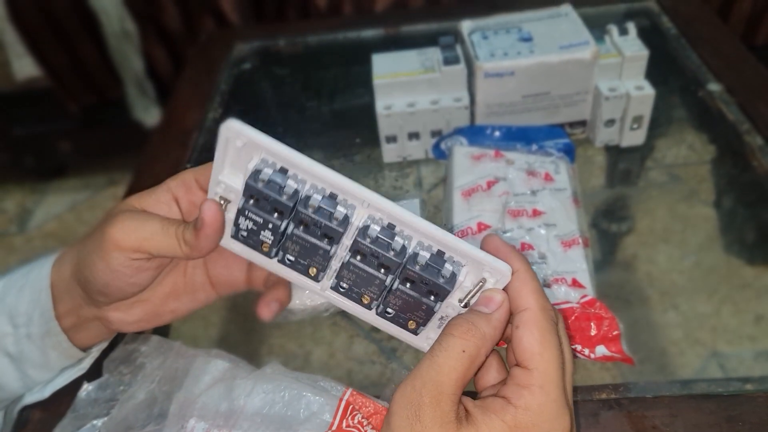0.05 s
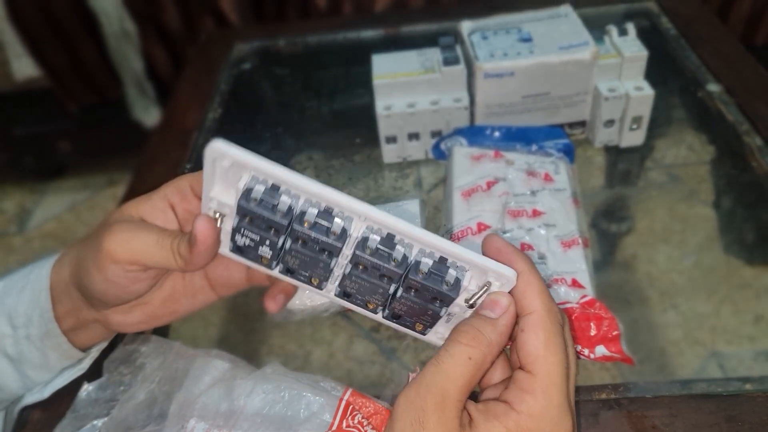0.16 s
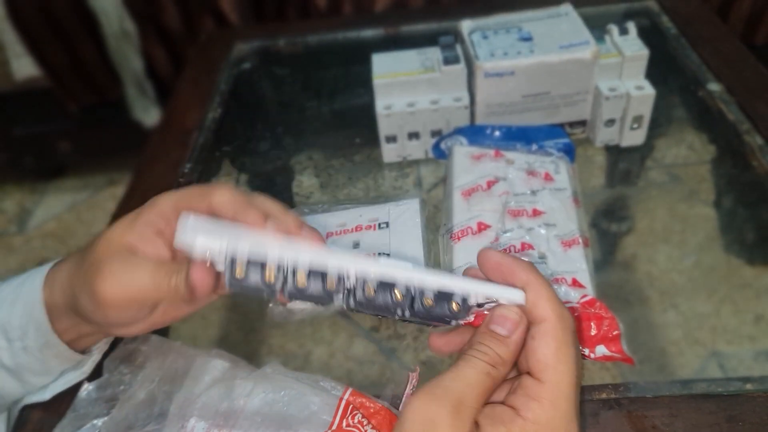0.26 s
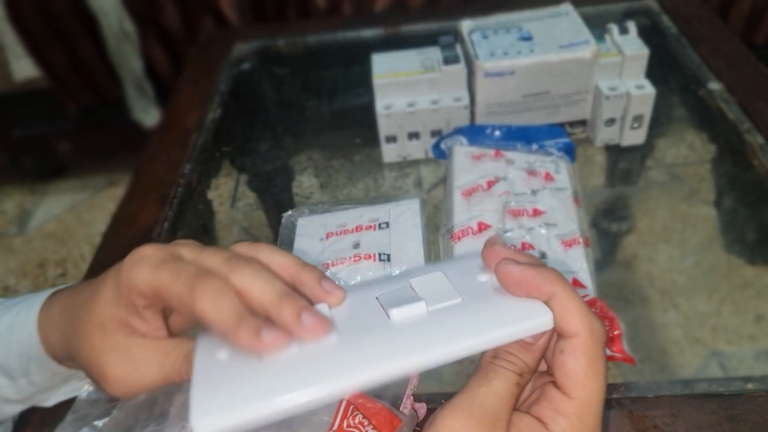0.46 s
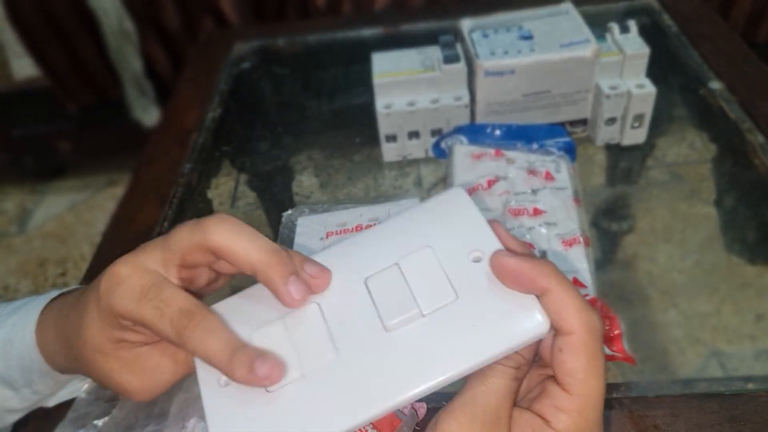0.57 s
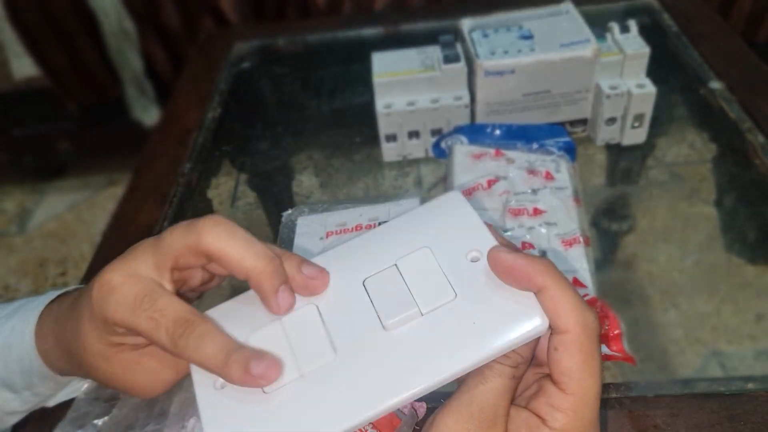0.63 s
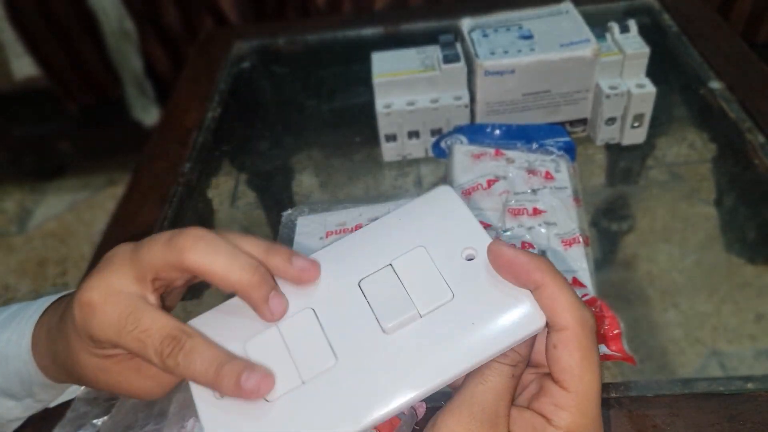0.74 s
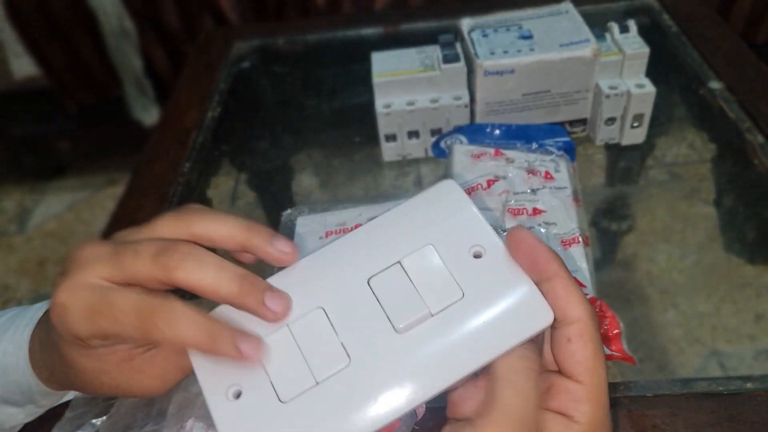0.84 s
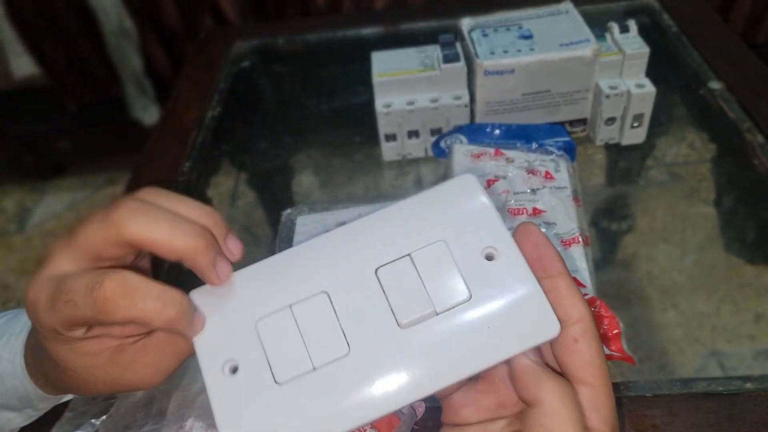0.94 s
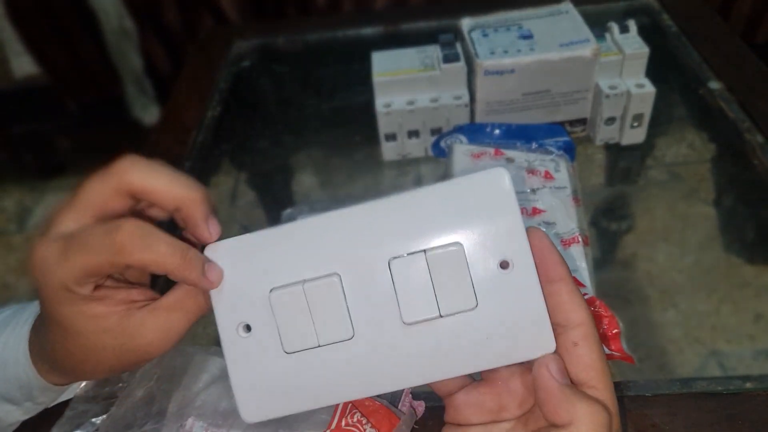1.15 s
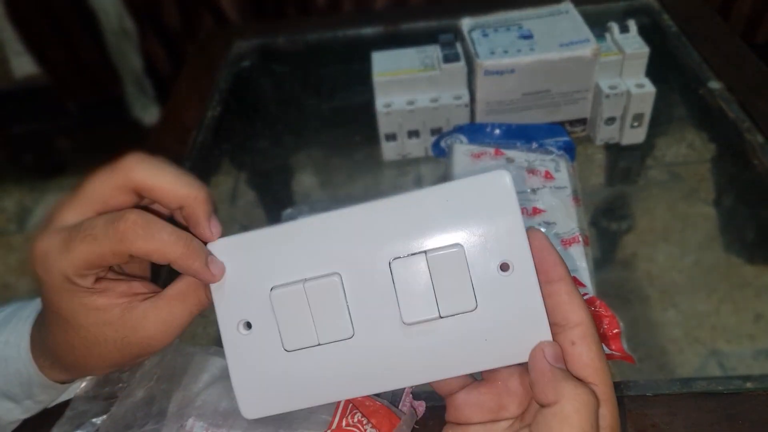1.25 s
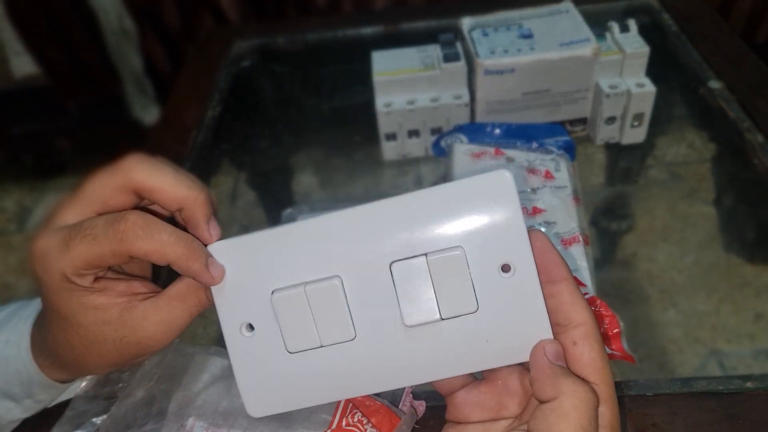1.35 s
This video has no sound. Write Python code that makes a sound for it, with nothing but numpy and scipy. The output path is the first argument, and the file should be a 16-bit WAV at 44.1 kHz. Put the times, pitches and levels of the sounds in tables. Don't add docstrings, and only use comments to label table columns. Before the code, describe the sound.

One loud crisp switch click rings briefly in a hard room, then faint finger ticks on plastic.

```python
import sys
import numpy as np
from scipy import signal
from scipy.fft import rfft, irfft
from scipy.io import wavfile
from scipy.ndimage import uniform_filter1d

SR = 44100
rng = np.random.default_rng(int(sys.argv[2]) if len(sys.argv) > 2 else 0)


def generate_wav(signal):
    frames = np.transpose(np.atleast_2d(signal))
    scaled = np.clip(frames, -1, 1) * 32767
    pcm = np.round(scaled).astype(np.int16)
    wavfile.write(sys.argv[1], SR, pcm)


def volts_from_decibels(level):
    exponent = np.asarray(level, float) / 20
    return 10 ** exponent


N = 61740
FAINT_TOP_HZ = 15900


def evened(x):
    return x / np.sqrt(np.mean(x ** 2) + 1e-20)


def read(points, hz):
    point_hz, value = np.transpose(points)
    return np.interp(np.log(hz + 1), np.log(point_hz + 1), value)


def add(mix, start_s, sound):
    at = round(start_s * SR)
    sound = sound[..., max(-at, 0):]
    part = mix[..., max(at, 0):][..., :sound.shape[-1]]
    part += sound[..., :part.shape[-1]]


def sides(pan_db):
    return volts_from_decibels(np.array([[.5], [-.5]]) * pan_db)


def slow(width_hz, size):
    r = np.exp(-np.pi * width_hz / SR)
    return evened(signal.lfilter([1], [1, -2 * r, r * r], rng.standard_normal(size)))


def stroke_shape(t, length_s):
    return (2 * t / length_s) * np.exp(1 - 2 * t / length_s)


# hz, t60_s
ROOM_DECAY = [(500, .2), (1300, 0.28), (2600, .5), (5000, 0.47), (8000, 0.49), (12000, 0.36), (16000, .28)]
# hz, level_db
SNAP_TO_ROOM = [(600, -35), (1200, -10), (2000, -18.5), (3500, -10.5), (5900, -7), (7200, -10.5),
                (8600, -8), (16000, -19)]
ROOM_RISE_S, ROOM_PAN_DB = 0.004, -8.5


def room(colour):
    taps = np.zeros((2, SR))
    slots = np.arange(60, SR - 12, 12)
    at = slots + rng.integers(0, 12, (2, len(slots)))
    np.put_along_axis(taps, at, rng.choice([-1., 1.], at.shape), 1)
    hz, t, z = signal.stft(taps, SR, nperseg=256)
    level_db = read(colour, hz)[:, None] - 60 * t / read(ROOM_DECAY, hz)[:, None]
    z = z * (hz < FAINT_TOP_HZ)[:, None] * volts_from_decibels(level_db)
    tail = signal.istft(z, SR, nperseg=256)[1][:, :SR]
    rise = 1 - np.exp(-(np.arange(SR) / SR / ROOM_RISE_S) ** 2)
    return tail * rise * sides(ROOM_PAN_DB)


# hz, level_db_per_hz
AIR_COLOUR = [(28, -30), (52, -5.5), (608, -11), (950, -21.5), (3000, -25), (4100, -25), (4800, -35),
              (16000, -62)]
# hz, likeness
AIR_LIKENESS = [(60, 1), (180, 0.98), (550, 0.15), (1650, -0.0063), (4970, -0.65), (15000, 0.03)]
# hz, left_minus_right_db
AIR_BALANCE = [(60, -3), (180, 0.5), (550, -1.5), (1650, 6), (4970, -8), (15000, -20)]
AIR_DB = -53


def air():
    frames, hz = N // 256 + 5, np.fft.rfftfreq(1024, 1 / SR)
    a, b, c, d, patches = rng.standard_normal((frames, 513, 5)).T
    patches_db = 0.99 * evened(uniform_filter1d(uniform_filter1d(patches, 12, 0), 10, 1))
    same = np.clip(read(AIR_LIKENESS, hz), -1, 1)[:, None]
    left = a + 1j * b
    right = same * left + np.sqrt(1 - same ** 2) * (c + 1j * d)
    balance_db = np.array([.5, -.5])[:, None, None] * read(AIR_BALANCE, hz)[:, None]
    z = np.array([left, right]) * volts_from_decibels(read(AIR_COLOUR, hz)[:, None] + patches_db + balance_db)
    z *= (hz < FAINT_TOP_HZ)[:, None]
    return volts_from_decibels(AIR_DB) * evened(signal.istft(z, nperseg=1024, noverlap=768)[1][:, :N])


# pitch_hz, width_hz, level_db, left_right_likeness
FAN_TONES = [(62, 10, -73.5, 0.82), (195.6, 6.5, -62.5, .9), (302, 16, -65.5, 0.65), (401, 53, -61, 1),
             (599.6, 56, -62.5, 0.45), (694, 55, -68, 0.34), (1952, 75, -64.5, 0.37), (2244, 38, -77.5, .5)]
# time_s, hum_db, rumble_db
FAN_BEAT = [(0.0, -51, -64), (0.07, -57.5, -71), (0.12, -57.5, -55.5), (0.252, -59, -62),
            (0.392, -53, -50.5), (0.444, -49.5, -55.5), (0.584, -53.5, -69), (0.658, -52.5, -58),
            (0.772, -48.5, -82), (0.834, -60.5, -62.5), (0.958, -50, -55), (1.056, -59.5, -55),
            (1.114, -48.5, -62), (1.168, -73, -57), (1.204, -57.5, -61.5), (1.4, -52, -62)]
TWICE_MAINS_HZ, RUMBLE_HZ, STEADY = 100, 38.3, 0.24


def fan():
    out, t = np.zeros((2, N)), np.arange(N) / SR
    for hz, width_hz, level_db, same in FAN_TONES:
        a = slow(width_hz, (4, 2 * N))[:, N:]
        z = a[:2] + 1j * a[2:]
        same = np.clip(same, 0, 1)
        z = np.array([z[0], same * z[0] + np.sqrt(1 - same ** 2) * z[1]])
        waver = STEADY * np.sqrt(2) + (1 - STEADY) * z
        out += volts_from_decibels(level_db) * (waver * np.exp(2j * np.pi * (hz * t + rng.random()))).real
    time_s, hum_db, rumble_db = np.transpose(FAN_BEAT)
    port_phase = np.array([[0], [.45]])
    for hz, level_db in [(TWICE_MAINS_HZ, hum_db), (RUMBLE_HZ, rumble_db)]:
        out += volts_from_decibels(np.interp(t, time_s, level_db) + 2.5) * np.sin(2 * np.pi * hz * t + port_phase)
    return out * sides(-1.8)


# start_s, length_s, pitch_hz, level_db, overtone_db
CHEEPS = [
    (-.02, 0.069, 4130, -53, -29),
    (0.177, 0.035, 4440, -49.5, -24),
    (.46, 0.12, 4000, -69.5, -41),
    (0.601, 0.12, 3900, -65.5, -34),
    (0.677, 0.07, 3963, -60, -23.5),
    (0.896, 0.11, 4160, -62.5, -39),
    (0.947, 0.083, 3950, -64, -28),
    (1.081, 0.0088, 4140, -51.5, -15.5),
    (1.094, 0.1, 4175, -48, -22.5),
    (1.222, 0.19, 3946, -64, -44),
]
# multiple, level_db
OVERTONES = [(.5, 6), (1.5, -4.5), (2, -0.5), (2.5, -13.5), (3, -2.5), (3.5, -14)]
CHEEP_RISE_S, CHEEP_FADE_DB, CHEEP_T60_S, CHEEP_PAN_DB = .004, -6.5, 0.33, -7
WOBBLE, WOBBLE_HZ, FUZZ, BLUR_HZ = 0.017, 505, 0.54, 232


def bird():
    out, t = np.zeros((2, N)), np.arange(SR // 2) / SR
    for start_s, length_s, pitch_hz, level_db, overtone_db in CHEEPS:
        wobbling_hz = pitch_hz * (1 + WOBBLE * slow(WOBBLE_HZ, len(t)))
        phase = 2 * np.pi * np.cumsum(wobbling_hz) / SR
        a, b = slow(BLUR_HZ, (2, 2, len(t)))
        blur = 1 - FUZZ + FUZZ * (a + 1j * b) / np.sqrt(2)
        tone = (blur * np.exp(1j * phase)).real
        for multiple, line_db in OVERTONES:
            swell = 0.2 + slow(multiple * BLUR_HZ, (2, len(t)))
            tone = tone + volts_from_decibels(overtone_db + line_db) * swell * np.sin(multiple * phase)
        fall_db = CHEEP_FADE_DB * np.minimum(t / length_s, 1)
        fall_db = fall_db - 60 * np.maximum(t - length_s, 0) / CHEEP_T60_S
        add(out, start_s, volts_from_decibels(level_db + 5.5 + fall_db) * np.minimum(t / CHEEP_RISE_S, 1) * tone)
    return out * sides(CHEEP_PAN_DB)


# start_s,
# length_s, centre_hz, width_hz
CREAKS = [(.177, .020, 13300, 500), (.184, .02, 8240, 500), (.198, .012, 13300, 500),
          (.421, .003, 5800, 1300), (.422, .003, 2400, 1600), (.533, .007, 7800, 300),
          (.540, .008, 5650, 500), (.543, .006, 2700, 400), (.544, .005, 4930, 500),
          (.545, .004, 9300, 900), (.547, .007, 7030, 300), (.549, .006, 4600, 250),
          (.831, .014, 5750, 250), (.845, .005, 5700, 250), (.852, .014, 5860, 200),
          (.855, .007, 1700, 250), (.857, .007, 2930, 250), (.858, .009, 7060, 300),
          (.864, .008, 1300, 250), (1.033, .018, 6940, 400), (1.042, .014, 5170, 300),
          (1.043, .014, 5940, 400), (1.044, .014, 8060, 400), (1.045, .017, 3080, 600),
          (1.046, .014, 2080, 400), (1.058, .012, 1350, 350), (1.063, .005, 5940, 400)]
CREAK_DB = [-62, -66, -61, -56, -60, -66, -64, -63, -60.5, -66.5, -69, -65, -68, -66.5, -62, -63, -61.5,
            -73.5, -65.5, -69.5, -66.5, -63, -66, -66, -61, -60, -62]
FINGER_PAN_DB = -9.5


def creaks():
    out, t, hz = np.zeros((2, N)), np.arange(8192) / SR, np.fft.rfftfreq(8192, 1 / SR)
    for (start_s, length_s, centre_hz, width_hz), level_db in zip(CREAKS, CREAK_DB):
        grit = rng.standard_normal((2, 8192))
        stroke = (grit + .6 * grit[::-1]) * stroke_shape(t, length_s)
        ring = 1 / (1 + 2j * (hz - centre_hz) / width_hz) ** 2
        ring = ring / np.sqrt(np.mean(abs(ring) ** 2))
        add(out, start_s, volts_from_decibels(level_db) * irfft(rfft(stroke) * ring))
    return out * sides(FINGER_PAN_DB)


# end_s, level_db, growth_db_per_s
SWELLS = [
    (0.2141, -34, 1202.5),
    (1.404, -62, 1501.5),
]
SWELL_TOP_HZ = 9010


def swells():
    t, hz = np.arange(N) / SR, np.fft.rfftfreq(N, 1 / SR)
    colour = volts_from_decibels(read(SNAP_TO_ROOM, hz)) / (1 + (hz / SWELL_TOP_HZ) ** 6)
    noise = evened(irfft(rfft(rng.standard_normal((2, N))) * colour, N))
    swell = np.zeros(N)
    for end_s, level_db, growth_db_per_s in SWELLS:
        swell += volts_from_decibels(level_db + growth_db_per_s * np.minimum(t - end_s, 0)) * (t < end_s)
    return noise * swell


# start_s, level_db, left_minus_right_db, tilt_db_per_octave
STRIKES = [(0.2145, -4.5, 3.5, 1.5), (0.2135, -16.5, -5, 3), (0.2151, -15, 20, -4.5),
           (0.2163, -17.5, -4, 6.5), (0.2179, -25.5, 6.5, 5.5), (0.2202, -25.5, -9, -1.5),
           (0.2208, -29.5, 9.5, -8), (0.2237, -34.5, -1, 4.5), (0.2285, -30.5, -3.5, -2),
           (0.234, -35, -3, -2.5), (0.2455, -31, 4.5, -2)]
# pitch_hz, left_db, right_db, t60_s
BODY = [(1385, -33, -36, 0.03), (2205, -24, -28.5, 0.015), (3200, -7.5, -18.5, 0.0086),
        (4000, -5, -9.5, 0.0085), (5230, -4.5, -2, .008), (5926, 2.5, 5, 0.0084), (6460, -7.5, -7.5, .005),
        (7370, -12, -12.5, 0.0038), (8170, -13, -2.5, 0.0076), (8930, -13, -8.5, 0.013),
        (9770, -7.5, -8.5, 0.0055), (11540, -6.5, -10, 0.0056), (13180, -11, -15, 0.0048),
        (14350, -9, -16.5, 0.008)]
SNAP_S = STRIKES[0][0]
RIGHT_LAG_S, CONTACT_S, DETUNE = .00015, 0.00025, 0.029
THUD_HZ, THUD_DB, THUD_T60_S = 733, -40, 0.0096


def snap():
    t, out = np.arange(4000) / SR, np.zeros((2, 4000))
    hz, left_db, right_db, t60_s = np.transpose(BODY)[:, :, None]
    sign = (-1) ** np.arange(len(hz))[:, None]
    for start_s, level_db, pan_db, tilt_db in STRIKES:
        where = volts_from_decibels(2.3 * rng.standard_normal(hz.shape)) * sign
        here_hz = hz * (1 + DETUNE * (start_s > SNAP_S) * rng.standard_normal(hz.shape))
        ports = [(left_db + pan_db / 2, 0), (right_db - pan_db / 2, RIGHT_LAG_S)]
        for k, (mode_db, lag_s) in enumerate(ports):
            u = np.maximum(t - start_s + SNAP_S - lag_s, 0)
            ring_db = level_db + mode_db + tilt_db * np.log2(hz / 6000) - 60 * u / t60_s
            ring = volts_from_decibels(ring_db) * np.sin(2 * np.pi * here_hz * u)
            out[k] += (where * ring).sum(0) * (1 - np.exp(-u / CONTACT_S))
    thud = volts_from_decibels(THUD_DB - 60 * t / THUD_T60_S) * np.sin(2 * np.pi * THUD_HZ * t)
    return out + thud


# start_s, level_db, length_s, centre_hz
TICKS = [
    (.4215, -75, 0.0034, 6000),
    (0.535, -70.5, 0.012, 7480),
    (.5445, -64.5, 0.005, 4200),
    (0.55, -61, 0.013, 3200),
    (0.839, -70, .025, 5060),
    (.857, -68, 0.005, 2610),
    (0.899, -78, 0.1, 13000),
    (1.035, -67.5, 0.022, 8500),
    (1.041, -59, 0.016, 4000),
    (1.06, -57, 0.0036, 3500),
]
# hz, level_db
PLATE = [(1300, 11.5), (2200, -11), (3000, -1), (4200, -5), (5900, -8), (7500, -14), (10000, -9),
         (14000, -18)]
TICK_OCTAVES, GRIT_PER_S = 1.07, 1900
TICK_RING, TICK_SPREAD_DB, TICK_DRY = 0.52, 4.5, 0.42


def ticks():
    out, t, hz = np.zeros((2, N)), np.arange(16384) / SR, np.fft.rfftfreq(16384, 1 / SR) + 1
    mode_hz, t60_s = np.transpose(BODY)[[0, 3], :, None]
    for start_s, level_db, length_s, centre_hz in TICKS:
        grains = rng.random(16384) < GRIT_PER_S / SR
        grit = rng.standard_normal((2, 16384)) * (0.46 + 3 * grains)
        stroke = (grit + .5 * grit[::-1]) * stroke_shape(t, length_s)
        mode_gain = volts_from_decibels(TICK_SPREAD_DB * rng.standard_normal(t60_s.shape))
        modes = (mode_gain / (1 + 1j * (hz - mode_hz) * t60_s * TICK_RING)).sum(0)
        band = np.exp(-.5 * (np.log2(hz / centre_hz) / TICK_OCTAVES) ** 2)
        colour = (modes + TICK_DRY) * (hz < FAINT_TOP_HZ) * volts_from_decibels(read(PLATE, hz)) * band
        colour = evened(abs(colour)) * np.exp(1j * np.angle(colour))
        sound = irfft(rfft(stroke) * colour)[:, :len(t) * 7 // 8]
        add(out, start_s, volts_from_decibels(level_db) * sound)
    return out * sides(FINGER_PAN_DB)


EARLIER_S, EARLIER_DB = 0.14, -5
WET_DB, RING_WET_DB, TOUCH_WET_DB = -9, -36.5, -32.5


def scene():
    mix = air() + fan() + bird() + swells()
    click = snap()
    touch = ticks() + creaks()
    flat = room([(20, 0), (20000, 0)])
    ring_wet = signal.fftconvolve(click.mean(0)[None], flat, axes=1)[:, :SR]
    wet = volts_from_decibels(WET_DB) * room(SNAP_TO_ROOM) + volts_from_decibels(RING_WET_DB) * ring_wet
    add(mix, -EARLIER_S, volts_from_decibels(WET_DB + EARLIER_DB) * room(SNAP_TO_ROOM))
    add(mix, SNAP_S, click)
    add(mix, SNAP_S, wet)
    touch_wet = signal.fftconvolve(touch, flat, axes=1)[:, :N]
    return mix + touch + volts_from_decibels(TOUCH_WET_DB) * touch_wet


def low_pass(x):
    return signal.sosfilt(signal.butter(12, 16830, fs=SR, output="sos"), x)


def record(dry):
    lowpass = signal.firwin(255, 16500, window=("kaiser", 9), fs=SR)
    mix = np.clip(signal.oaconvolve(dry, lowpass[None], "same"), -1, 1)
    return low_pass(mix)


dry = scene()
out = record(dry)
generate_wav(out)
```